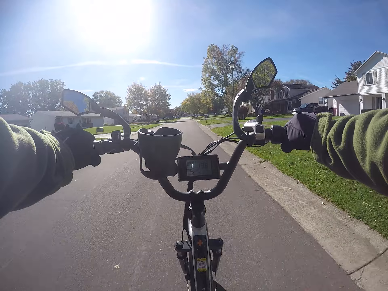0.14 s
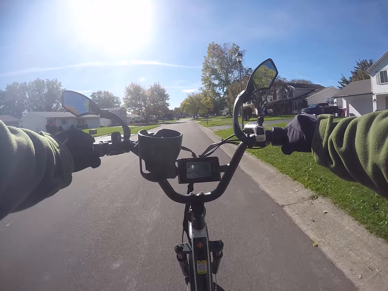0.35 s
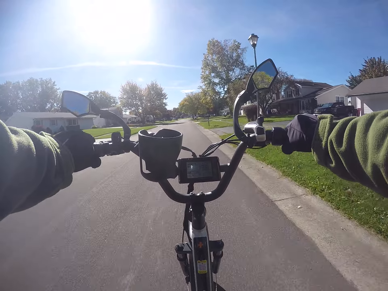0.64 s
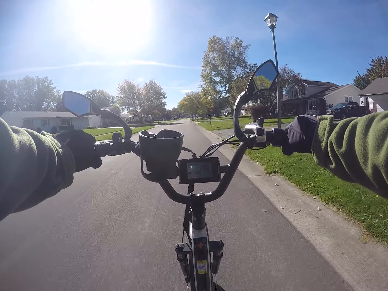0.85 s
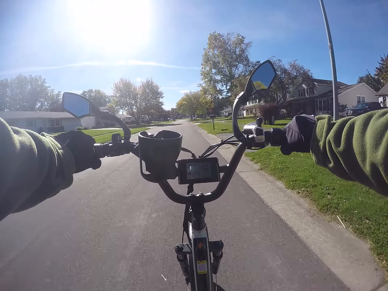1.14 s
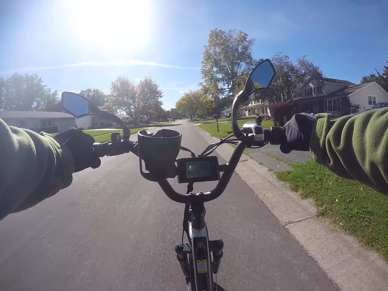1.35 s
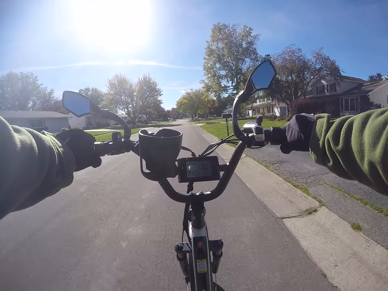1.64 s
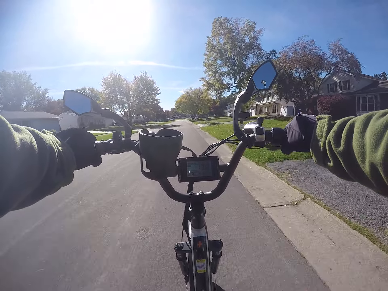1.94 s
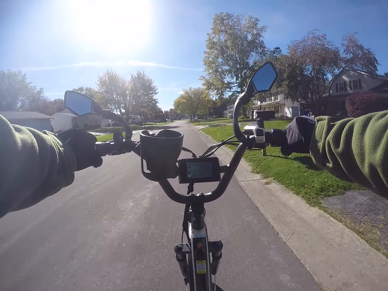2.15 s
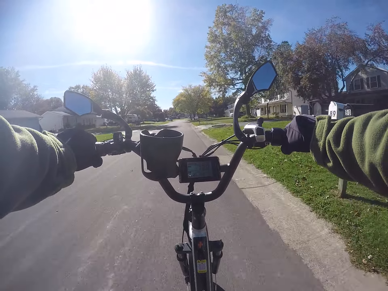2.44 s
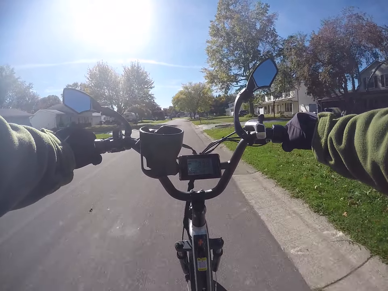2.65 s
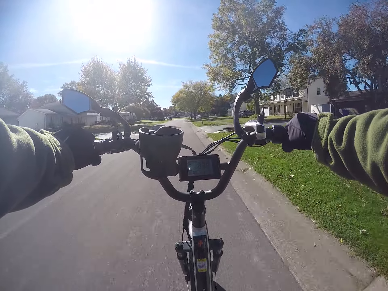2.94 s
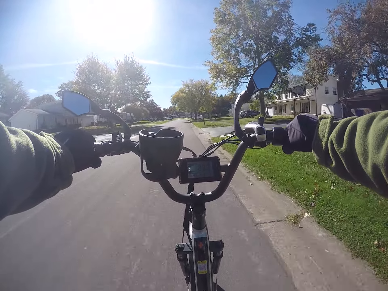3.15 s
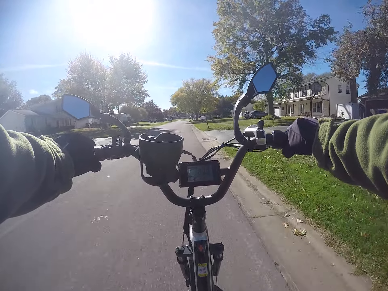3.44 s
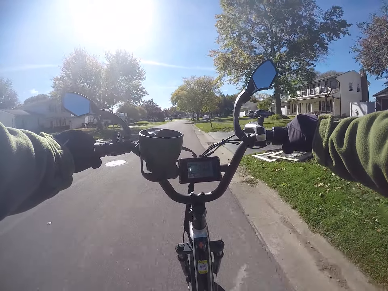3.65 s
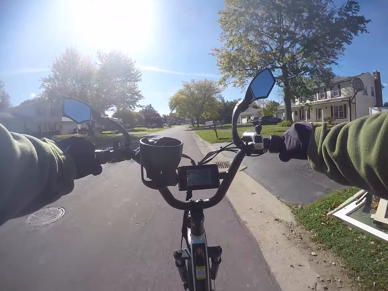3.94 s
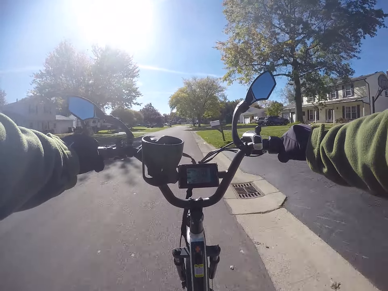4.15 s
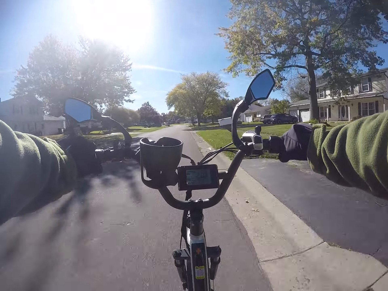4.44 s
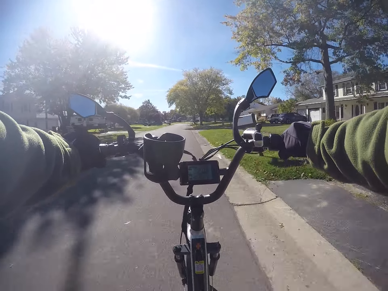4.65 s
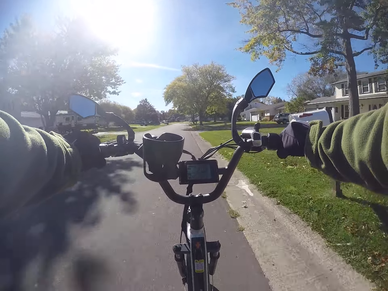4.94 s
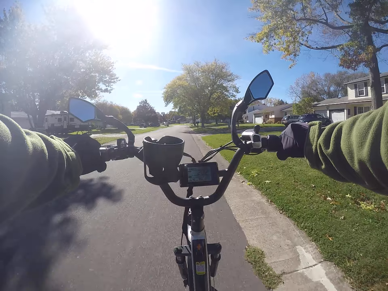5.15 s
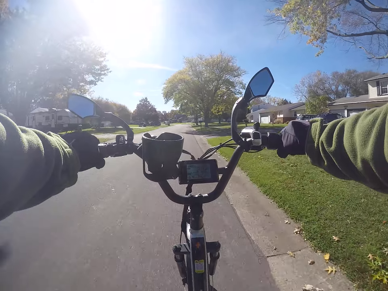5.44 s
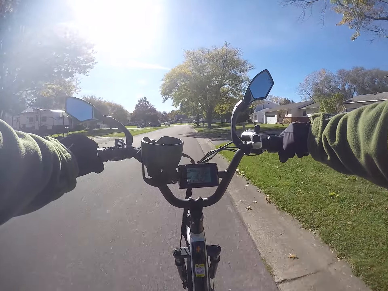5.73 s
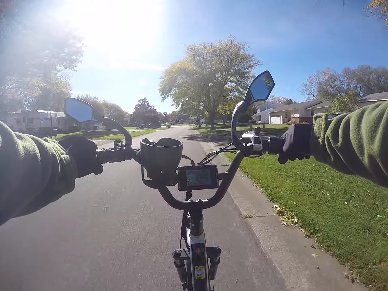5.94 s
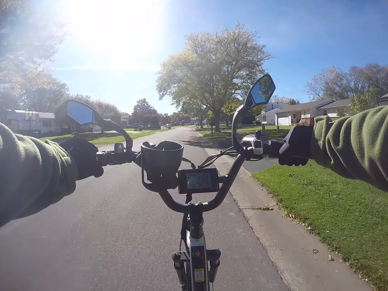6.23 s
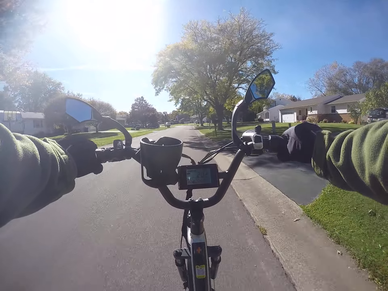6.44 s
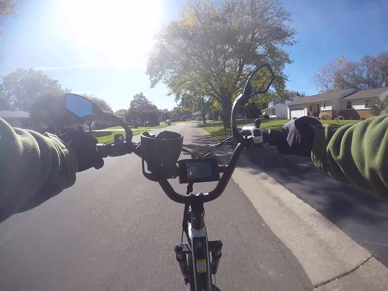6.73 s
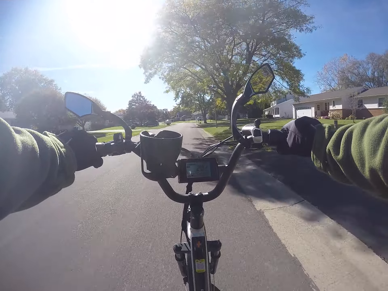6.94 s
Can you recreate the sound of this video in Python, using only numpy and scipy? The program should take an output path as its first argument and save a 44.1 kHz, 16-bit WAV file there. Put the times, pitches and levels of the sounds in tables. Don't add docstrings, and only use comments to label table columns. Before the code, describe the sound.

An electric bicycle cruises at nearly constant speed on open suburban asphalt, heard close and dry in mono from a small cased camera on the bike. From 0 s a geared hub motor whines around 1 kHz, quickly warbling in strength and pitch with each wheel turn, with thin higher overtones. Below it, knobby tyres hum near 340 Hz and grainy road noise shakes the frame. Low wind buffets and flutters irregularly throughout, with stronger bumps around 1, 2.4 and 4.7 s. Faint ticks dot the ride. The motor eases slightly after 4.2 s, pushes again about 4.7 s, then fades from 5.7 s with the clearest click. Around 6 s only tyre hum, grit, wind and faint electronic hiss and whistle remain. Near 6.6 s the whine returns, a little lower, and continues to the end at 7.1 s.

```python
import sys
import numpy as np
from scipy import signal
from scipy.fft import rfft, irfft, next_fast_len
from scipy.io import wavfile
from scipy.ndimage import uniform_filter1d, map_coordinates

SR = 44100
rng = np.random.default_rng(int(sys.argv[2]) if len(sys.argv) > 2 else 0)


def generate_wav(sig):
    pcm = np.round(np.clip(np.atleast_2d(sig).T, -1, 1) * 32767).astype(np.int16)
    wavfile.write(sys.argv[1], SR, pcm)


def how_loud(loudness_db):
    steps = np.asarray(loudness_db, float) / 20
    return 10 ** steps


N = 312667

# (time [s], front tread knobs passing [Hz])
SPEED = [(0, 336.3), (1.4, 339.1), (2.3, 338.6), (3.75, 343.2), (4.1, 343), (4.33, 339.3), (4.55, 345),
         (4.8, 343.4), (5.4, 343.3), (6.2, 336.6), (6.9, 328.5), (7.09, 328.8)]
KNOBS, REAR_KNOBS = 60.75, 63.2

# (time [s], level [dB], drift [dB/s])
THROTTLE = [
    (0, 0.5, 0.2),
    (1.0, 1, 0.5),
    (3.4, 1, 0),
    (4.2, 1, -1.5),
    (4.7, 2.5, -.5),
    (5.67, -3, -17),
    (6.0, -43, 8),
    (6.625, 0, -1.5),
]
RESPOND_S = .04
SLIP, GRIP_DB, FREE_DB = .057, -3, -9
# (contacts [per wheel turn], level [dB], share of wear pattern [0-1+])
MESH = [
    (180, -48.5, 1.3),
    (450, -68.5, .4),
    (630, -74, .2),
    (168.5, -67, 1),
]
# (place [turn 0-1], loss [dB], width [turn 0-1])
WEAR = [(.1, 14.5, .036), (.342, 14, .04), (.59, 5, .045), (.82, 10, .055)]
SOUND_TEETH_DB = 4
RIPPLE = [(1, .7, 3), (2, .9, 2.8), (2.5, 1.2, -1.8), (3, 1, 2), (5, 1, 2.5), (6, 1.2, -.6)]
# (multiple [per wheel turn], level [dB])
GEAR_ORDERS = [(50, -71), (88, -75), (90, -60), (95, -68), (100, -69), (150, -79), (168, -72), (169, -72),
               (170, -71), (174, -72), (190, -79)]
# (frequency [Hz], width [Hz], level [dB])
HUB_MODES = [(520, 53, -8), (972, 68, 2), (2540, 88, -11), (3480, 75, -8), (3703, 110, -11.5),
             (4054, 100, -12.5), (4430, 104, -10), (4633, 102, -11.5), (6000, 630, -27)]

# (time [s], coarseness [dB])
ROAD = [(0, -0.5), (1.1, .5), (1.5, 0.5), (2.1, -2), (2.6, 0.9), (3.35, -1), (3.75, 1.3), (4.3, -.5),
        (4.6, 2), (5.05, -.5), (5.9, 0.5), (6.7, 0), (7.09, -1)]
# (time [s], level [dB])
LEAN = [(0, -2.5), (1.2, -.5), (1.5, 1), (3, -0.5), (4.4, -3.5), (4.9, -0.5), (5.6, -1), (6.3, -10),
        (6.7, -.5), (7.09, 0.5)]
HUM_DB, OCTAVE_DB, ROLL_DB = -53, -60.5, -50.5
HUM_BLUR, OCTAVE_BLUR, OCTAVE_LEAN = 0.25, 2, .7
# (frequency [Hz], width [Hz], level [dB])
FRAME_MODES = [(339.4, 23.2, 0.5), (532, 82, -5.5), (675, 101, -4), (1113, 206, -15), (1514, 157, -2),
               (1711, 205, -2), (2043, 73, -5.5), (2212, 93, -10.5), (2752, 95, -10.5), (2940, 82, -14),
               (3440, 470, -18.5), (4480, 550, -22), (5090, 490, -33), (5800, 180, -31), (6920, 200, -32),
               (7400, 59, -38)]
# (time [s], peak level [dB], treble level [dB])
TICKS = [(0.7935, -42, -29), (1.4915, -44, -27), (3.27, -44, -21), (3.6394, -43, -24), (4.082, -41, -29.5),
         (4.5024, -42, -28), (4.6624, -41, -23), (5.2574, -39, -31), (5.6675, -32, -12.5),
         (6.557, -42, -31), (6.6263, -38, -33)]

# (frequency [Hz], level [dB per Hz])
BUFFET_SPECTRUM = [(4, -28), (8, -1), (21, 4.5), (34, -0.5), (55, -8), (80, -35), (200, -75)]
# (frequency [Hz], level [dB per Hz])
FLUTTER_SPECTRUM = [(20, -28), (45, -10.5), (63, -1.5), (95, -8.5), (134, -13.5), (208, -23.5),
                    (300, -25.5), (900, -43.5), (3000, -72)]
BUFFET_DB, FLUTTER_DB = -36.5, -45
EDDY_DB, EDDIES_PER_S = 1.5, 16
# (time [s], length [s], buffeting level [dB], flutter level [dB])
GUSTS = [(0.097, 0.27, 0, 4.5), (.35, 0.07, 5, 2), (0.555, .1, 2.5, 4.5), (.8, 0.088, -3, -1),
         (1, 0.08, 6.5, -0.5), (1.2, 0.2, 4, 5), (1.567, .08, 7, 5), (1.805, 0.14, -9.5, -0.5),
         (2.406, 0.1, 10, 4), (2.52, 0.056, -7, 0.5), (3.0, 0.47, -1.5, -3), (3.4, 0.22, 1, 3.5),
         (3.622, 0.19, 4, -0.5), (3.893, 0.11, -6, -3), (4.155, 0.16, 8, -1.5), (4.307, 0.09, -4.5, -1.5),
         (4.52, .1, 6, -1.5), (4.677, 0.08, 9.5, 0), (4.887, 0.17, 4, 4.5), (5.024, 0.046, -12, 4.5),
         (5.18, 0.22, 3, 3.5), (5.6, 0.067, -4, -1), (5.68, 0.06, 5, -1.5), (6.002, 0.36, -1, -2.5),
         (6.297, 0.069, 3.5, 3.5), (6.525, 0.047, -8, 2.5), (6.83, 0.071, 5, 5), (7.03, .12, 3.5, 3.5)]

# (frequency [Hz], level [dB per Hz])
HISS_SPECTRUM = [(300, -9), (1000, 3.5), (5000, -13), (8000, -15.5), (11000, -20), (13200, -18.5),
                 (13800, -15), (14700, -21), (15300, -28)]
# (frequency [Hz], jitter [Hz], level [dB])
WHISTLES = [(9440, 90, -79), (14190, 100, -87)]
FRAME_RATE = 47.952
# (frequency [Hz], width [Hz], share removed [0-1])
HOLLOWS = [(2122, 45, .7), (3930, 120, .4), (4340, 110, .4), (4950, 200, .35)]
TOP_HZ = 15290


def unit(x):
    return x / np.sqrt(np.mean(x ** 2) + 1e-20)


def curves(rows):
    s, *cols = np.transpose(rows)
    return [np.interp(np.arange(N) / SR, s, c) for c in cols]


def wobble(rate):
    knots = rng.standard_normal(int(N * rate / SR) + 4)
    return map_coordinates(knots, [np.arange(N) * rate / SR])


def filtered(x, response):
    m = next_fast_len(N + SR // 2)
    return irfft(rfft(x, m) * response(np.fft.rfftfreq(m, 1 / SR)), m)[:N]


def coloured(points):
    f, db = np.transpose(points)
    shape = lambda hz: how_loud(np.interp(np.log(hz + 1), np.log(f + 1), db))
    return unit(filtered(rng.standard_normal(N), shape))


def resonant(modes):
    def response(f):
        total = 0
        for k, (hz, width, db) in enumerate(modes):
            total = total + (-1) ** k * how_loud(db) * 1j * f * width / (hz * hz - f * f + 1j * f * width)
        return total
    return response


def gritty(rough_db, rate):
    return unit(rng.standard_normal(N) * how_loud(rough_db * wobble(rate)))


def tone(cycles, drift, flicker_db):
    phase = 2 * np.pi * (cycles + rng.random() + drift * wobble(11))
    return unit(how_loud(flicker_db * wobble(9)) * np.sin(phase))


def wheel_turns():
    return np.cumsum(curves(SPEED)[0]) / SR / KNOBS


def motor(turns):
    load_db = throttle()
    slip = np.interp(load_db, [FREE_DB, GRIP_DB], [SLIP, 0])
    turns = turns - np.cumsum(np.gradient(turns) * slip)
    slack = how_loud(-2 * np.clip(load_db + 1, -5, 0))
    main, *high = whine(turns, slack)
    orders = sum(how_loud(db) * tone(k * turns, drift=0.029, flicker_db=0.5) for k, db in GEAR_ORDERS)
    swell = 1 + 0.12 * np.sin(10 * np.pi * turns)
    teeth = swell * gritty(rough_db=1.5, rate=250) * how_loud(0.99 * wobble(8.5))
    rattle = unit(filtered(teeth, resonant(HUB_MODES)))
    shell = filtered(main, resonant([(1003, 100, .6)]))
    tones = how_loud(.45 * load_db) * (orders + sum(high))
    return how_loud(load_db - 1.16) * shell + tones + how_loud(-56) * how_loud(.5 * load_db) * rattle


def whine(turns, slack):
    place = np.arange(100) / 100
    losses = sum(db * np.exp(-.5 * ((place - at) / wide) ** 2) for at, db, wide in WEAR)
    wear_db = SOUND_TEETH_DB - losses
    swings = sum(depth / (2 * np.pi * k) * np.sin(2 * np.pi * k * turns + angle) for k, depth, angle in RIPPLE)
    warble = swings / MESH[0][0]
    tones = []
    for k, db, share in MESH:
        strength = np.interp(turns, place, how_loud(share * wear_db), period=1)
        strength = uniform_filter1d(strength, size=200)
        mesh = tone(k * (turns + warble), drift=slack * k / 1800, flicker_db=1.2)
        tones.append(how_loud(db) * unit(strength * mesh))
    return tones


def throttle():
    t = np.arange(N) / SR
    s, db, drift = np.transpose(THROTTLE)
    now = np.clip(np.searchsorted(s, t, side="right") - 1, 0, None)
    load_db = db[now] + drift[now] * (t - s[now])
    return uniform_filter1d(load_db, size=round(RESPOND_S * SR), mode="nearest")


def tyres(turns):
    coarse_db, lean_db = curves(ROAD)[0], curves(LEAN)[0]
    hum_db = HUM_DB + lean_db - HUM_BLUR * coarse_db
    octave_db = OCTAVE_DB + OCTAVE_LEAN * lean_db - OCTAVE_BLUR * coarse_db
    roll_db = ROLL_DB + coarse_db
    hum = how_loud(hum_db) * tone(KNOBS * turns, drift=0.051, flicker_db=0.95)
    octave = how_loud(octave_db) * tone(2 * KNOBS * turns, drift=0.1, flicker_db=2.0)
    rear = how_loud(-61.0) * tone(REAR_KNOBS * turns, drift=0.24, flicker_db=1.5)
    grit = gritty(rough_db=2.0, rate=400) * how_loud(0.23 * wobble(14))
    roll = how_loud(roll_db + 2.5) * unit(filtered(grit, resonant(FRAME_MODES)))
    return hum + octave + rear + roll


def ticks():
    knocks, snaps = np.zeros(N + SR), np.zeros(N + SR)
    t = np.arange(SR // 50) / SR
    shape = (1 - np.exp(-t / .001)) * how_loud(-60 * t / .015)
    for s, db, treble_db in TICKS:
        burst = rng.standard_normal((2, len(t))) * shape
        ring = 0
        for hz in (2200, 3300):
            ring = ring + np.sin(2 * np.pi * (hz * rng.uniform(.95, 1.05) * t + rng.random()))
        start = round(s * SR)
        knocks[start:start + len(t)] += how_loud(db) * (burst[0] + 0.4 * ring * shape)
        snaps[start:start + len(t)] += how_loud(db + treble_db + 2) * burst[1]
    knock = filtered(knocks[:N], resonant([(2180, 500, 5), (3550, 1300, 3.0), (6000, 2100, -4.5)]))
    snap = filtered(snaps[:N], resonant([(9600, 3800, 0), (13200, 2100, 1)]))
    return knock + snap


def steady(x):
    power = np.abs(uniform_filter1d(x ** 2, size=SR // 6))
    return x / np.sqrt(power + 0.11)


def wind():
    buffet_db, flutter_db = gusts()
    buffet = how_loud(buffet_db) * unit(steady(coloured(BUFFET_SPECTRUM)))
    flutter = how_loud(flutter_db) * unit(steady(coloured(FLUTTER_SPECTRUM)))
    return buffet + flutter


def gusts():
    t = np.arange(N) / SR
    buffet_db, flutter_db = np.full(N, float(BUFFET_DB)), np.full(N, float(FLUTTER_DB))
    for s, long_s, b_db, f_db in GUSTS:
        bell = np.exp(-.5 * (2 * (t - s) / long_s) ** 2)
        buffet_db += b_db * bell
        flutter_db += f_db * bell
    return buffet_db, flutter_db + EDDY_DB * wobble(EDDIES_PER_S)


def electronics():
    t = np.arange(N) / SR
    gate = np.clip(1.2 - 1.6 * np.cos(2 * np.pi * (t * FRAME_RATE - .07)), .1, 1)
    whistle = 0
    for hz, jitter_hz, db in WHISTLES:
        clock = np.sin(2 * np.pi * np.cumsum(hz + jitter_hz * wobble(400)) / SR)
        whistle = whistle + how_loud(db) * unit(gate * how_loud(1.6 * wobble(60)) * clock)
    return how_loud(-61) * coloured(HISS_SPECTRUM) + whistle


def scene():
    turns = wheel_turns()
    return (motor(turns) + tyres(turns) + ticks() + wind() + electronics())[None]


def top_cut(x):
    return signal.sosfilt(signal.butter(12, 15320, fs=SR, output="sos"), x)


def record(dry):
    def case(f):
        passed = 1
        for hz, width, share in HOLLOWS:
            passed = passed * (1 - np.clip(share, 0, 1) * resonant([(hz, width, 0)])(f))
        return passed * (f < TOP_HZ)
    mix = filtered(dry[0], case)[None]
    return top_cut(mix)


dry = scene()
out = record(dry)
generate_wav(out)
```